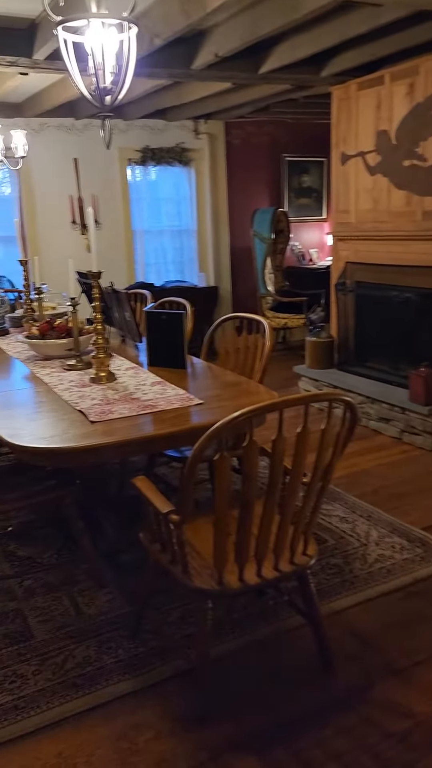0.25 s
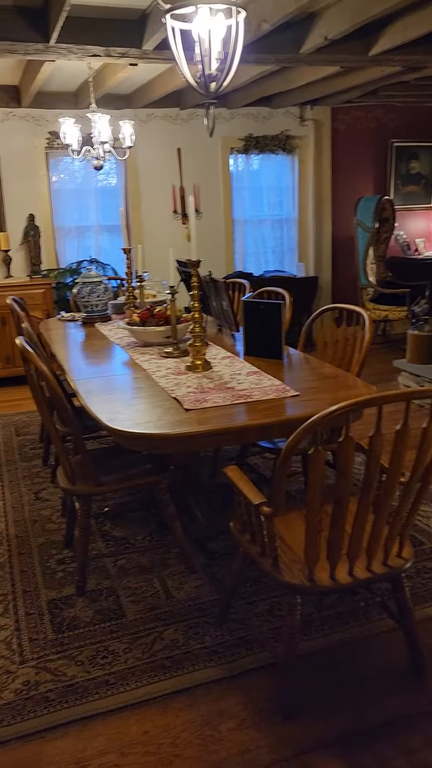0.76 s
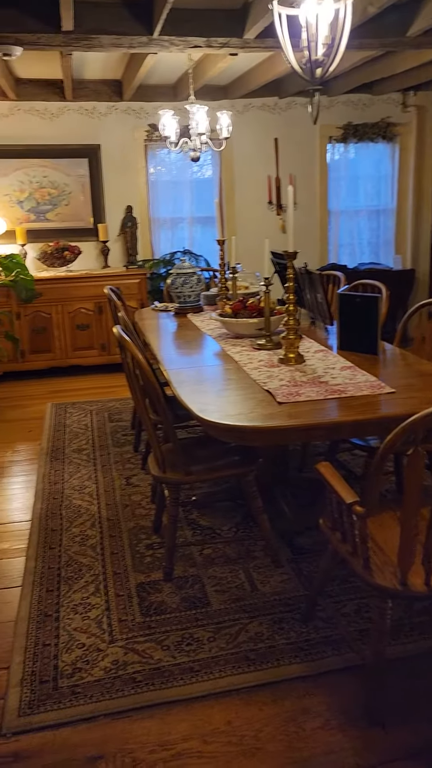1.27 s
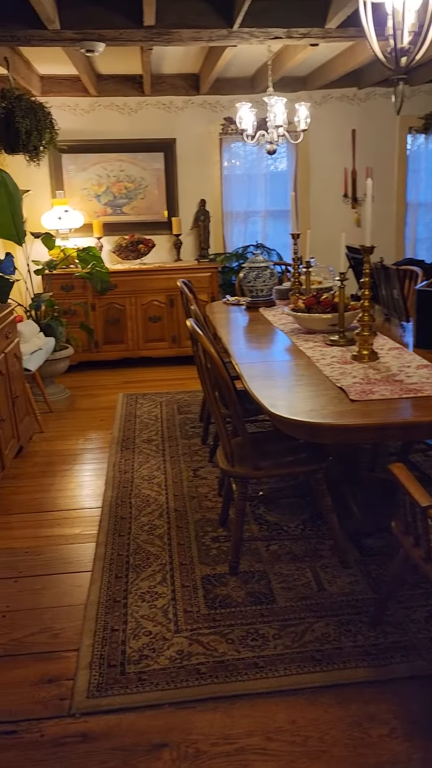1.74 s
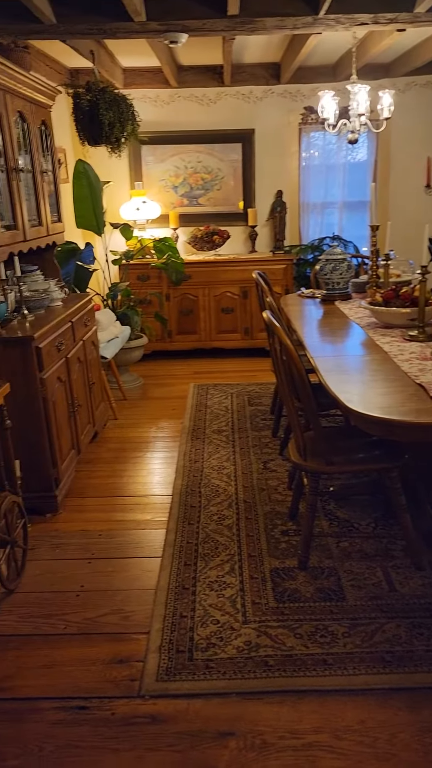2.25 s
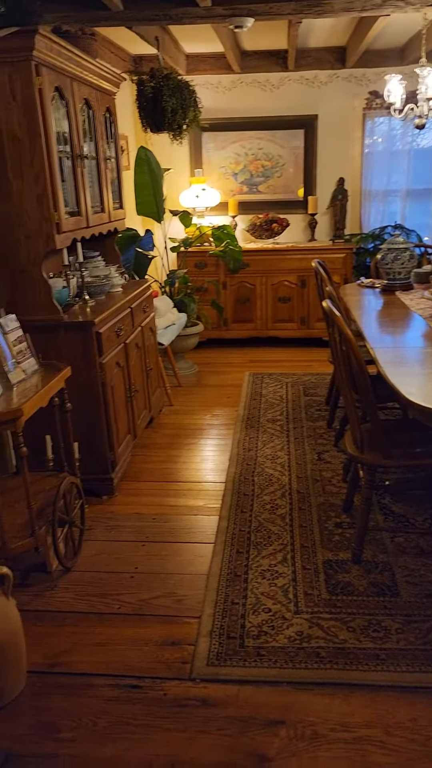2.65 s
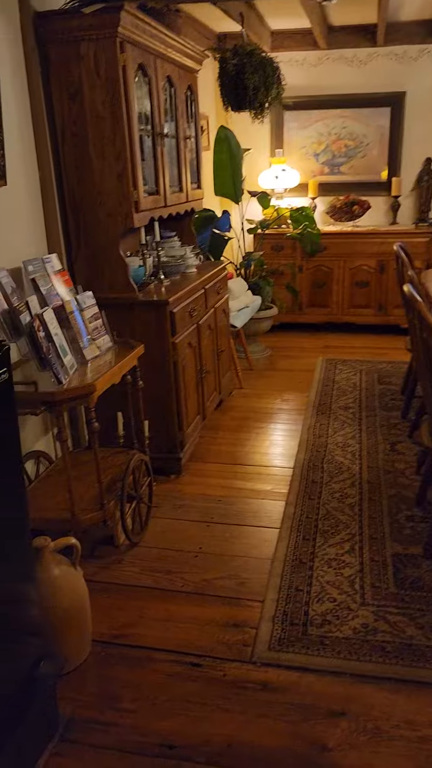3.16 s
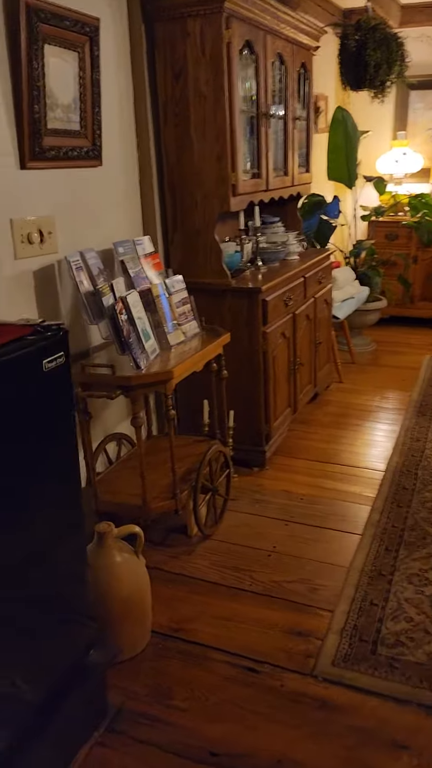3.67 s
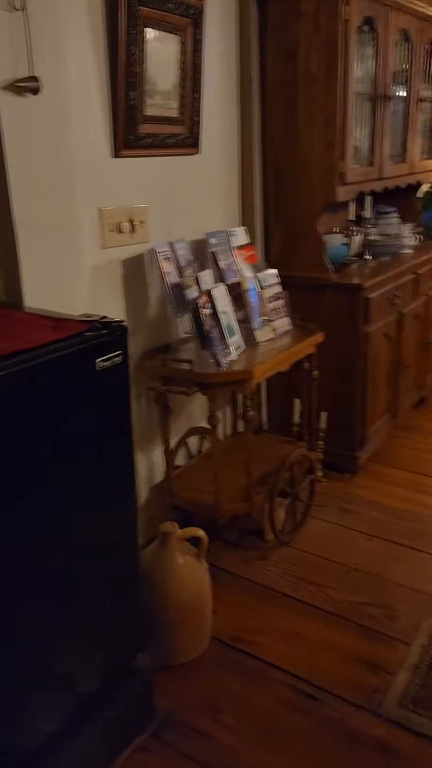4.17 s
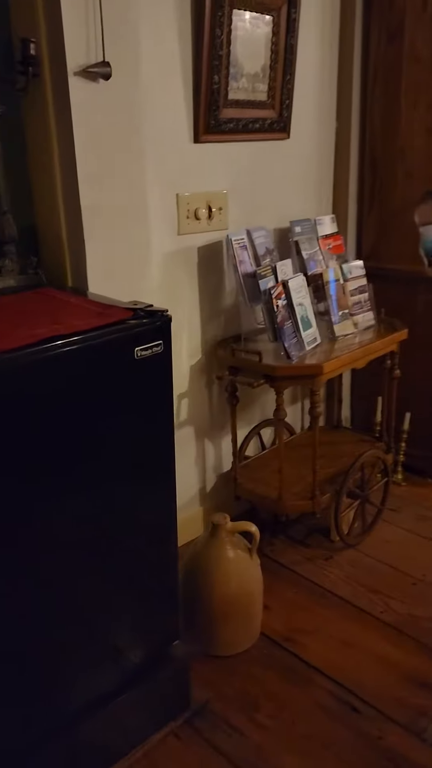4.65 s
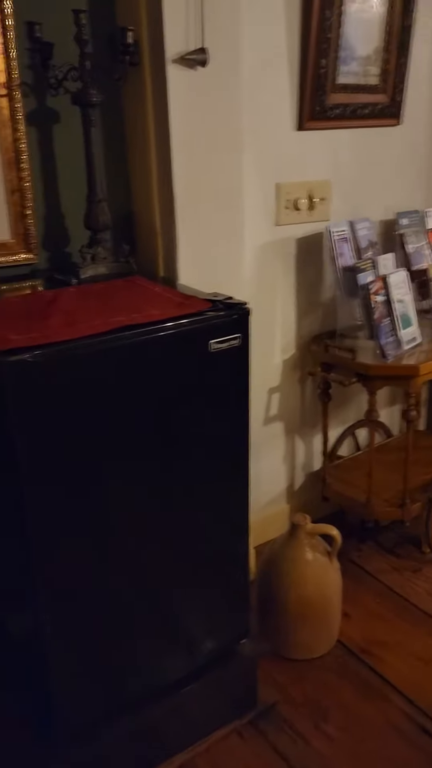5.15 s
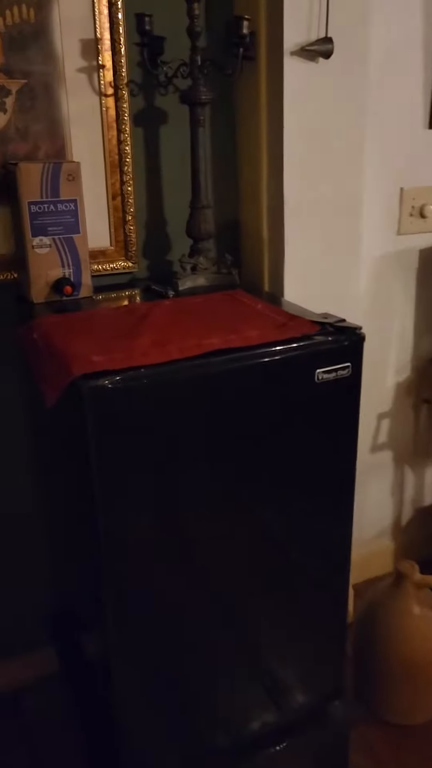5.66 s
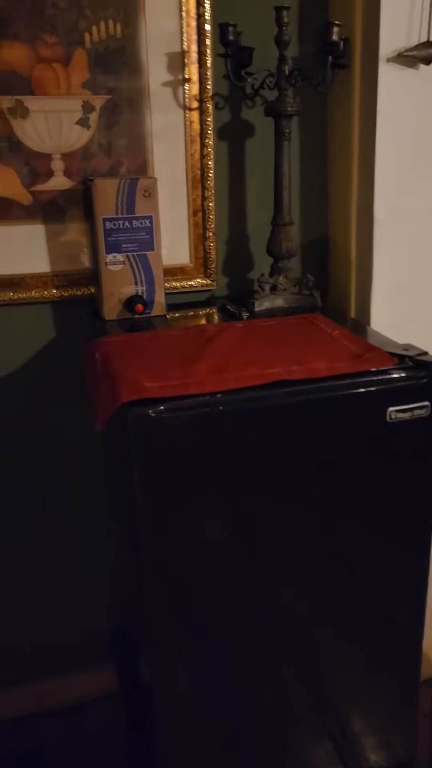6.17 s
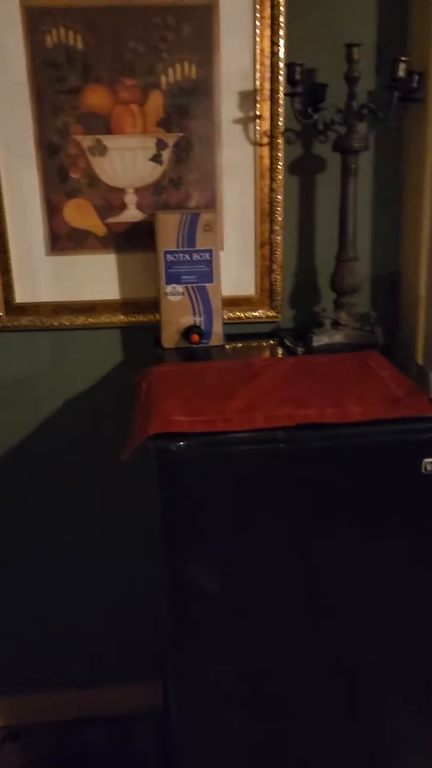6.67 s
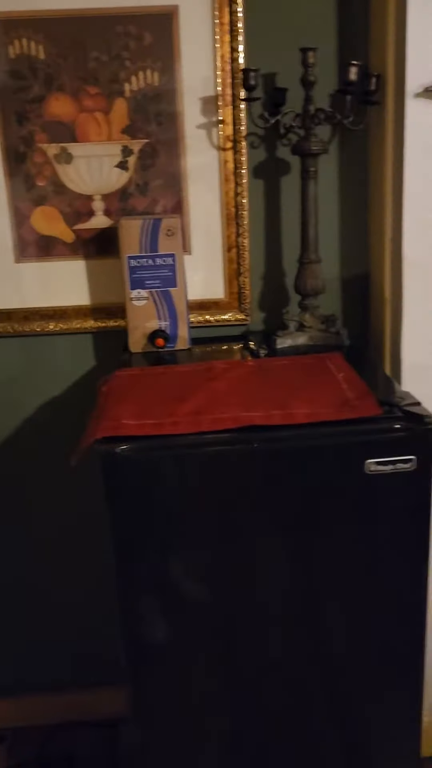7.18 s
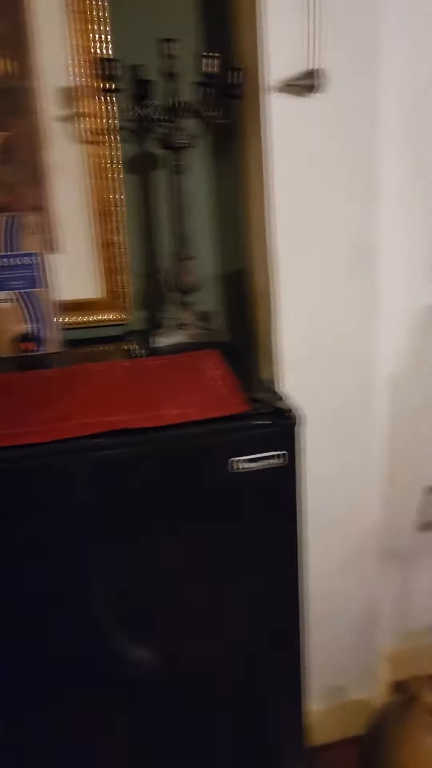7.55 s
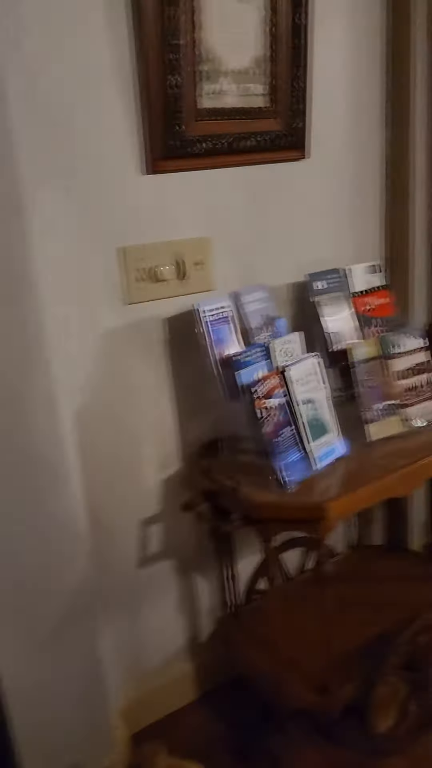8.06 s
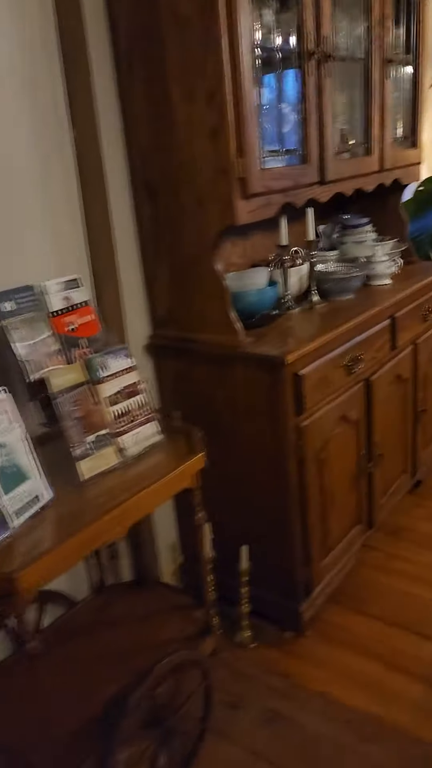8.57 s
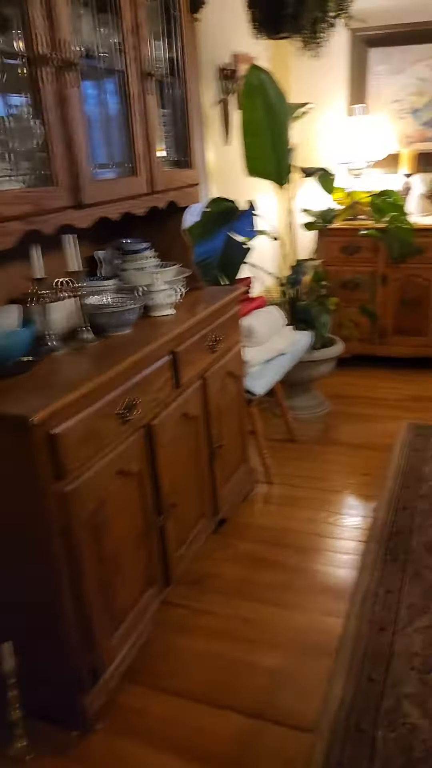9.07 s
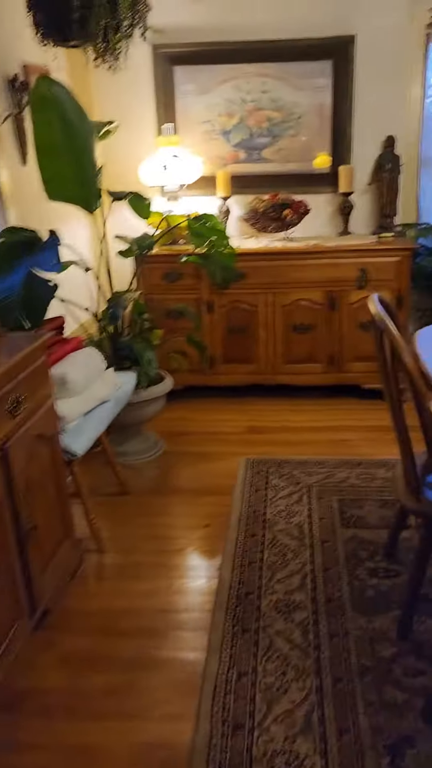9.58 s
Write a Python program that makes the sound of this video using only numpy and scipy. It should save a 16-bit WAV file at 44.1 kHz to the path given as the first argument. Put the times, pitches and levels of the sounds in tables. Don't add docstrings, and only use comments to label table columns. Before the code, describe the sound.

An unseen walker moves slowly over old wooden boards, captured by a phone held above the feet. Crisp snaps come first, followed by a sparse lull, then light scuffs and a tiny nail creak. Steps become denser and heavier toward the end, with woody thumps, gritty sole slides and faint cloth brushes in a short, dry room.

```python
import sys
import numpy as np
from scipy import signal
from scipy.io import wavfile
from scipy.ndimage import uniform_filter1d

SR = 44100
rng = np.random.default_rng(int(sys.argv[2]) if len(sys.argv) > 2 else 0)


def persist_wave(psi):
    counts = np.round(np.clip(psi, -1, 1) * 32767).astype(np.int16)
    wavfile.write(sys.argv[1], SR, np.atleast_2d(counts).T)


def gain_from_db(level_db):
    decades = np.asarray(level_db, float) / 20
    return 10 ** decades


N = 433062

# (frequency [Hz], level [dB per Hz])
AIR_SPECTRUM = [(53, -35), (90, -5), (176, -8), (249, 0), (385, -17), (457, -10), (821, -18), (1510, -25),
                (1720, -18), (1910, -30), (2270, -23), (2590, -32), (4860, -30), (5900, -42), (16000, -47)]
# (frequency [Hz], level [dB])
FRIDGE_HUM = [(59.2, -62), (209.9, -81), (468.3, -83)]
# (frequency [Hz], t60 [s])
ROOM_DECAY = [(150, 0.34), (400, 0.13), (1040, 0.26), (2760, 0.23), (7280, 0.21)]
# (frequency [Hz], left-right likeness, clipped to 0..1)
PORT_LIKENESS = [(60, -3.8), (180, 1.1), (550, 0.31), (1650, -0.7), (4970, 9.5), (15000, -6.7)]
# (frequency [Hz], width [Hz], level [dB])
PORTS = [
    (6800, 2600, 9),
    (7450, 1500, 10),
]
# (frequency [Hz], level [dB], t60 [s])
METAL_MODES = [(7994, 0, 0.12), (10970, -10, 0.25), (11580, -14, 0.14), (12680, -2, 0.12)]
# (centre time [s], level [dB], half length [s])
SWISHES = [
    (4.195, -75, .03),
    (5.536, -85, .08),
    (8.29, -74, 0.081),
    (8.89, -69, 0.28),
    (9.703, -78, .04),
]
# (time [s], weight shifting [dB], soles dragging [dB])
SHUFFLE = [(0, -64.5, -64), (.6, -73, -91), (.8, -65, -81), (1.6, -72.5, -81), (2.398, -78.5, -92),
           (3.302, -71.5, -88), (4.7, -69.5, -86), (5.15, -61.5, -81.5), (5.9, -80, -87), (6.17, -49, -73),
           (6.47, -64.5, -87), (6.8, -51, -73.5), (7.45, -51.5, -61), (7.72, -58.5, -79), (7.95, -47, -56),
           (8.5, -65.5, -73.5), (9.25, -66.5, -73.5), (9.82, -57, -74)]
# (low edge [Hz], high edge [Hz])
SHUFFLE_BANDS = [
    (25, 90),
    (90, 600),
    (700, 4500),
    (5000, 15000),
]
# (frequency [Hz], level [dB per Hz])
SHUFFLE_COLOUR = [(15, -39), (25, -10), (108, -4.5), (145, -9.5), (277, -6.5), (394, -6), (427, -7),
                  (677, -16.5), (1260, -5.5), (3080, -30), (7510, -43.5), (10400, -55.5), (16000, -48)]
# level of joists, boards, soles, cloth [dB]
SETTLE_DB = [-28, -25, -60, -80]
# (frequency [Hz], width [Hz] (not used), level [dB])
PLANK_MODES = [(904, 88, 0), (1420, 60, -6), (1900, 70, -11), (2120, 30, -11), (2720, 29, -15)]
# (time [s], level [dB], slip rate [1/s])
CREAK = [
    (4.85, -65, 25),
    (4.93, -63.5, 23.4),
    (4.97, -62.5, 60),
    (5.061, -63, 68),
    (5.119, -89, 60),
]
# (time [s], frequency [Hz], level [dB], t60 [s])
FIRST_SLIP = (4.8365, 2000, -38, .01)
# (low edge [Hz], high edge [Hz])
CONTACT_BANDS = [
    (320, 1150),
    (950, 3800),
    (4800, 12000),
]
# (time [s], crack [dB], knock [dB], snap [dB], slide [s])
SCUFFS = [(3.705, -30.5, -42, -27.5, 0.042), (3.8, -36.5, -87, -66, 0.031), (7.022, -33, -51, -41, 0.024),
          (4.229, -36, -41, -30, 0.05), (5.127, -38.5, -52, -60, 0.07), (5.415, -48, -79.5, -46.5, 0.022),
          (5.953, -35.5, -61, -38.5, 0.038), (6.149, -32.5, -44, -34, .029),
          (6.208, -28, -44, -28.5, 0.034), (6.31, -33, -43, -35.5, 0.035), (6.972, -29, -56, -55, 0.051),
          (7.009, -35, -37.5, -30.5, 0.027), (7.197, -29.5, -41, -33, 0.025), (7.35, -60, -53, -43, 0.034),
          (7.39, -33, -65, -48, 0.043), (8.066, -65, -42, -42, 0.13), (8.379, -43, -66, -40.5, 0.094),
          (9.312, -38, -49, -58, 0.13), (9.345, -35, -43.5, -60, 0.087), (9.483, -35.5, -48, -56, 0.082),
          (4.14, -52, -71, -65, .015), (6.72, -47, -57, -52, .015)]
# (time [s], knock [dB], crack [dB], slide [s])
KNOCKS = [(.346, -77, -74, .02), (3.306, -50, -78, 0.015), (3.64, -52.5, -84, 0.025),
          (4.664, -60.5, -65, 0.021), (4.808, -58, -86, 0.037), (5.175, -50.5, -75, .054),
          (5.24, -42, -37, 0.057), (6.03, -44.5, -46, 0.014), (6.515, -51, -70, 0.015),
          (6.822, -44, -62, 0.08), (7.469, -39, -49, 0.086), (7.79, -45, -75, 0.03),
          (7.856, -45, -43, 0.046), (8.159, -33.5, -29.5, 0.059), (8.692, -33, -29.5, 0.099),
          (9.68, -43.5, -53, 0.25)]
# (time [s], crack [dB], knock [dB], snap [dB])
CRACKS = [(0.0189, -14, -40, -12), (0.1553, -17.5, -45.5, -16.5), (0.4362, -14.5, -44, -13),
          (.527, -21, -77, -18.5), (0.5948, -20.5, -78, -23), (.645, -19, -37, -48),
          (1.096, -42.5, -51, -56), (1.207, -32, -42.5, -36.5), (1.504, -29.5, -44.5, -52.5),
          (2.296, -69, -73, -74), (2.531, -66, -72, -81), (3.933, -51, -75, -52), (4.03, -50, -66.5, -121),
          (4.374, -40.5, -58, -65.5), (4.567, -42.5, -50.5, -60), (5.615, -45.5, -57.5, -70),
          (6.614, -41, -45.5, -75), (6.761, -39.5, -64, -73), (6.842, -22.5, -38.5, -54),
          (7.107, -30, -44, -34), (7.272, -26.5, -41.5, -48), (7.504, -21.5, -52, -51),
          (7.598, -34, -66, -37.5), (7.69, -30.5, -35, -63), (8.099, -31, -63, -34.5),
          (8.479, -41, -55, -57), (8.595, -36, -34.5, -54), (9.045, -34, -60, -58), (9.587, -61, -68, -74)]
# (frequency [Hz], level [dB])
BOARD_MODES = [(60, -15.5), (82, -6), (116, -3), (157, 1.5), (190, 0.5), (235, -7), (278, 4), (340, 5),
               (425, 4), (520, 0), (640, -0.5), (790, -25), (960, -1.5), (1180, -5)]
# (time [s], peak [dB], pitch centre [Hz], hold [s])
TOES = [(0.017, -35, 318, 0.048), (0.345, -40.5, 356, 0.016), (0.444, -36.5, 356, 0.035),
        (0.649, -28, 310, .031), (1.092, -38, 375, 0.022), (1.508, -38, 325, 0.073), (3.3, -28, 278, 0.029),
        (3.702, -36.5, 223, 0.048), (5.612, -36, 407, 0.01), (5.952, -27, 456, 0.015),
        (6.151, -31.5, 246, 0.097), (6.201, -27, 288, 0.019), (6.31, -28.5, 444, 0.02),
        (6.603, -29.5, 430, 0.031), (7.0, -28.5, 330, 0.058), (7.109, -41, 288, 0.024),
        (7.202, -37, 277, 0.059), (7.27, -28, 257, .05), (7.689, -26.5, 305, 0.044),
        (9.499, -36, 212, 0.045)]
# (time [s], peak [dB], pitch centre [Hz], hold [s])
HEELS = [(.155, -43.5, 140, 0.048), (0.515, -24, 85, 0.033), (.56, -34.5, 91, 0.13),
         (1.204, -33, 163, 0.052), (3.637, -39.5, 49.6, 0.045), (4.224, -30.5, 65.3, 0.11),
         (5.173, -25.5, 120, 0.018), (5.236, -25.5, 177, 0.044), (5.48, -42, 187, 0.026),
         (5.985, -34, 61, 0.04), (6.07, -31.5, 51, 0.022), (6.515, -32.5, 83, 0.13),
         (6.821, -16, 150, 0.015), (7.471, -26, 112, 0.06), (7.513, -21, 105, 0.013),
         (7.87, -33.5, 106, 0.11), (8.158, -14, 103, 0.047), (8.595, -19.5, 199, 0.01),
         (8.69, -16, 153, .031), (8.73, -24, 165, 0.065), (9.256, -35, 73, 0.16),
         (9.359, -27.5, 157, 0.019), (9.687, -23, 232, 0.083), (9.74, -18.5, 214, 0.026)]


def evened(x):
    return x / np.sqrt(np.mean(x ** 2) + 1e-20)


def read(points, hz):
    f, value = np.transpose(points)
    return np.interp(np.log(hz + 1), np.log(f + 1), value)


def add(mix, s, sound):
    part = mix[..., max(round(s * SR), 0):][..., :sound.shape[-1]]
    part += sound[..., :part.shape[-1]]


def band(x, lo_hz, hi_hz, order=2):
    return signal.sosfilt(signal.butter(order, [lo_hz, hi_hz], "band", fs=SR, output="sos"), x)


def late(x, count):
    return np.concatenate([np.zeros(count), x])[:len(x)]


def resonate(x, hz, width):
    turn = np.exp(2j * np.pi * hz * np.arange(len(x)) / SR)
    r = np.exp(-np.pi * width / SR)
    return 2 * (turn * signal.lfilter([1 - r], [1, -r], x / turn)).real


def likeness(hz):
    return np.clip(np.maximum(read(PORT_LIKENESS, hz), 1 - (hz / 600) ** 2), 0, 1)[:, None]


def diffuse(magnitude, patchy_db):
    frames, hz = N // 256 + 5, np.fft.rfftfreq(1024, 1 / SR)
    a, b, c, d, patches = rng.standard_normal((frames, 513, 5)).T
    patches = uniform_filter1d(patches, size=10, axis=0)
    patches = evened(uniform_filter1d(patches, size=10, axis=1))
    same, left = likeness(hz), a + 1j * b
    right = same * left + np.sqrt(1 - same ** 2) * (c + 1j * d)
    z = np.array([left, right]) * gain_from_db(patchy_db * patches)
    z *= magnitude(hz[:, None], np.arange(frames) * 256 / SR)
    return signal.istft(z, nperseg=1024, noverlap=768)[1][:, :N] / np.sqrt(768)


def room(x, count=3):
    out, t = np.zeros((2, N)), np.arange(N) / SR
    for k in range(count):
        taps = np.zeros((2, SR // 2))
        at = np.arange(260, SR // 2 - 20, 20)
        at = at + rng.integers(0, 20, (2, len(at)))
        np.put_along_axis(taps, at, rng.choice([-1., 1.], at.shape), 1)
        hz, u, z = signal.stft(taps, SR, nperseg=512)
        same = likeness(hz)
        z[1] = same * z[0] + np.sqrt(1 - same ** 2) * z[1]
        decay = gain_from_db(-60 * u / read(ROOM_DECAY, hz)[:, None])
        tail = signal.istft(z * decay, SR, nperseg=512)[1]
        tail[:, :260] = 0
        tail = tail / np.linalg.norm(tail[0])
        turn = np.sqrt(2 / count) * np.cos(np.pi * (7 * t + k / count))
        out += signal.fftconvolve(x[None] * turn, tail, axes=1)[:, :N]
    return out


def air():
    t = np.arange(N) / SR
    tone = evened(diffuse(lambda hz, t: gain_from_db(read(AIR_SPECTRUM, hz)), patchy_db=.6))
    slow = uniform_filter1d(rng.standard_normal(N), size=4000)
    waver = 1 + .27 * evened(uniform_filter1d(slow, size=4000))
    hum = sum(np.sqrt(2) * gain_from_db(db) * np.sin(2 * np.pi * hz * t) for hz, db in FRIDGE_HUM)
    hiss = evened(band(rng.standard_normal((2, N)), 7100, 8700))
    near = np.clip((t - 2.76) / .1, 0, 1)
    return gain_from_db(-69.5) * tone + gain_from_db(-86.5) * hiss * near + waver * hum


def tinkle():
    out, t = np.zeros(N), np.arange(SR // 4) / SR
    ring = sum(gain_from_db(db - 60 * t / t60) * np.sin(2 * np.pi * hz * t) for hz, db, t60 in METAL_MODES)
    add(out, 8.379, gain_from_db(-62) * ring)
    return out


def swishes():
    t = np.arange(N) / SR
    swell = sum(gain_from_db(db) * np.exp(-((t - s) / max(half, .01)) ** 2) for s, db, half in SWISHES)
    return swell * evened(band(rng.standard_normal((2, N)), 5000, 14000, order=1))


def shuffle():
    rest_db, joist_share, cloth_db = -67, 0.59, -22
    settle_db_per_s = 75
    s, weight, drag = np.transpose(SHUFFLE)
    levels_db = [rest_db + joist_share * (weight - rest_db), weight, drag, drag + cloth_db]
    trims_db = [-21, -21, -17, -4.5]
    at, peak_db = np.transpose(HEELS + TOES)[:2, :, None]

    def magnitude(hz, t):
        colour, out = gain_from_db(read(SHUFFLE_COLOUR, hz)), 0
        fading = gain_from_db(peak_db - settle_db_per_s * abs(t - at)) ** 2
        settle = (fading * (t > at + .012)).sum(0)
        for (lo, hi), db, after_db, trim_db in zip(SHUFFLE_BANDS, levels_db, SETTLE_DB, trims_db):
            shape = colour / np.sqrt((1 + (lo / (hz + 1)) ** 6) * (1 + (hz / hi) ** 6))
            power = gain_from_db(np.interp(t, s, db)) ** 2 + settle * gain_from_db(after_db) ** 2
            out = out + power * (gain_from_db(trim_db) * shape / np.linalg.norm(shape)) ** 2
        return np.sqrt(out) * len(hz)
    return diffuse(magnitude, patchy_db=2.67)


def grit():
    grains_per_s, spread_db, level_db = 1500, 1.5, -6.5
    s, _, drag = np.transpose(SHUFFLE)
    size = gain_from_db(spread_db * np.minimum(rng.exponential(1, N), 4))
    size = size * (rng.random(N) < grains_per_s / SR)
    grains = band(size * rng.choice([-1., 1.], N), 1100, 3330)
    return evened(grains) * gain_from_db(np.interp(np.arange(N) / SR, s, drag) + level_db)


def creak():
    s, db, rate = np.transpose(CREAK)
    t = np.arange(N) / SR
    uneven = 1 + 0.056 * evened(uniform_filter1d(rng.standard_normal(N), size=600))
    turns = np.cumsum(np.interp(t, s, rate) * uneven) / SR
    slips = np.diff(np.floor(turns), prepend=0) > 0
    slips = slips * gain_from_db(2.5 * rng.standard_normal(N))
    plank = sum(gain_from_db(1.3 * level_db) * resonate(resonate(slips, hz, 150), hz, 500)
                for hz, _, level_db in PLANK_MODES)
    out = evened(plank) * gain_from_db(np.interp(t, s, db)) * (t > s[0]) * (t < s[-1])
    at, hz, ping_db, t60 = FIRST_SLIP
    t = t[:2000]
    ping = gain_from_db(ping_db - 60 * t / t60) * np.sin(2 * np.pi * hz * t)
    add(out, at, ping * np.minimum(t / .001, 1))
    return out


def cracks():
    splinter_s, scrape_db, swell_share = 0.0085, -21, 0.13
    knock_snap_db, least_snap_db = -14, -31
    rows = [(*row, splinter_s) for row in CRACKS]
    rows += SCUFFS
    rows += [(s, db, knock_db, db + knock_snap_db, slide) for s, knock_db, db, slide in KNOCKS]
    out, t = np.zeros((3, N)), np.arange(SR // 5) / SR
    noises = rng.standard_normal((len(rows), len(t)))
    for (s, db, knock_db, snap_db, slide), noise in zip(rows, noises):
        tick = np.sign(noise) * np.exp(-t / .0008) + 10 * (t == 0)
        swell = 1 - np.exp(-t / max(swell_share * slide, .0005))
        scrape = swell * np.exp(-(t / max(slide, .005)) ** 2)
        parts_db = [knock_db + 10.0, db - 7.5, max(snap_db - 19.5, db + least_snap_db)]
        for part, (lo_hz, hi_hz), part_db in zip(out, CONTACT_BANDS, parts_db):
            hit, rub = band(np.array([tick, noise]), lo_hz, hi_hz)
            contact = hit / abs(hit).max() + gain_from_db(scrape_db) * scrape * evened(rub)
            add(part, s, gain_from_db(part_db) * contact)
    return out


def thuds():
    landing_s = .002
    out, t, rows = np.zeros(N), np.arange(SR // 2) / SR, HEELS + TOES
    hz, db = np.transpose(BOARD_MODES)[:, :, None]
    chances = rng.random((len(rows), 2, len(hz), 1))
    for (s, peak_db, centre_hz, hold), (detune, phase) in zip(rows, chances):
        away_db = np.minimum(8.4 * np.log2(hz / centre_hz) ** 2, 19 + 20 * (hz < centre_hz))
        ring = np.sin(2 * np.pi * (hz * (.95 + 0.1054 * detune) * t + phase))
        landing = 1 - np.exp(-t / landing_s)
        weight = landing * np.exp(-(t / max(hold, .01) * (hz / 150) ** 0.12) ** 1.85)
        thud = (gain_from_db(db - away_db) * ring * weight).sum(0)
        add(out, s, gain_from_db(peak_db - 9.0) * thud / abs(thud).max())
    return out


def scene():
    port_lag, ceiling_s = 19, .004
    knock, crack, snap = cracks()
    crack = crack + creak() + grit()
    low = band(thuds(), 42, 1500)
    below = low + knock + .9 * crack + .8 * snap
    above = late(.5 * knock + .9 * crack + 4.2 * snap + tinkle(), round(ceiling_s * SR))
    left = late(below, port_lag) + above
    right = below + late(above, port_lag + 1)
    wet = room(.35 * low + 1.2 * knock + .9 * crack + 1.1 * snap)
    feet = np.array([left, right]) + wet + swishes()
    rung = [x + gain_from_db(db) * resonate(resonate(x, hz, width), hz, width)
            for x, (hz, width, db) in zip(feet, PORTS)]
    return (np.array(rung) + shuffle()) * gain_from_db([[-1], [.6]]) + air()


def band_limit(x):
    return signal.sosfilt(signal.butter(12, 16960, fs=SR, output="sos"), x)


def record(dry):
    edge = signal.firwin(255, 16150, fs=SR)[None]
    mix = signal.oaconvolve(dry, edge, "same")
    return band_limit(mix)


dry = scene()
out = record(dry)
persist_wave(out)
```